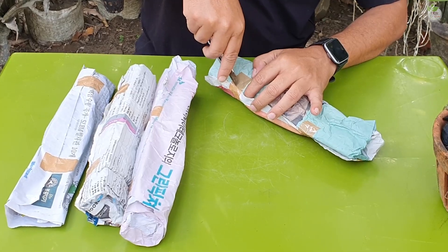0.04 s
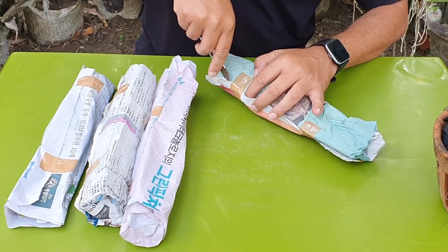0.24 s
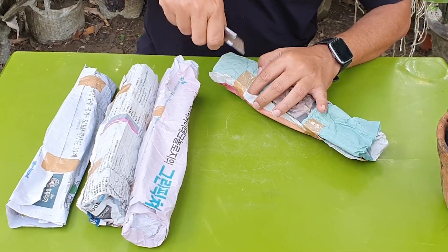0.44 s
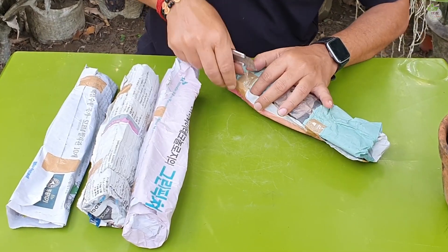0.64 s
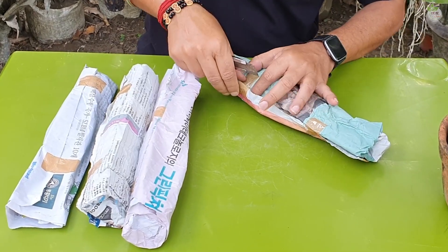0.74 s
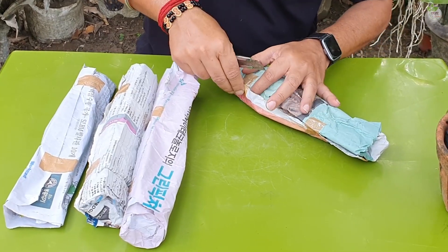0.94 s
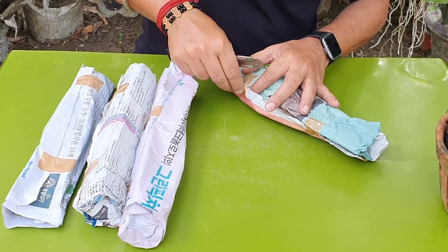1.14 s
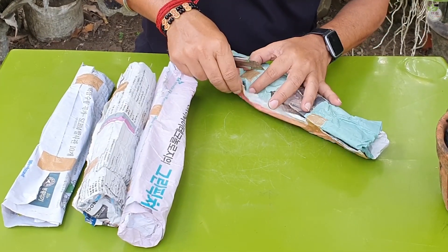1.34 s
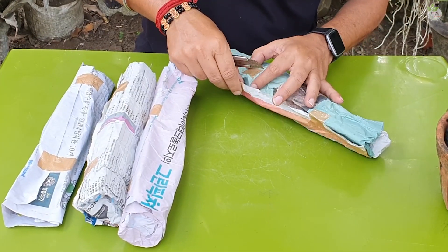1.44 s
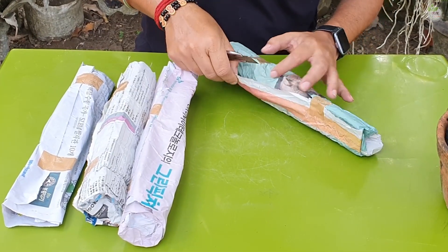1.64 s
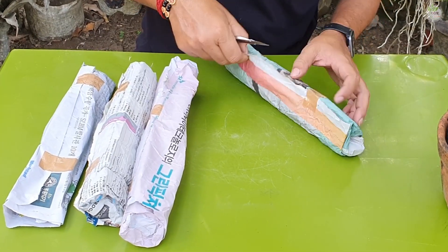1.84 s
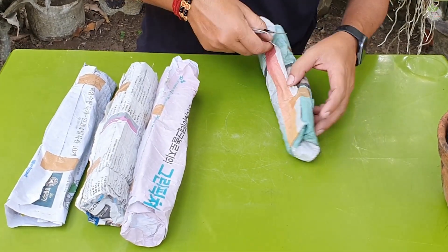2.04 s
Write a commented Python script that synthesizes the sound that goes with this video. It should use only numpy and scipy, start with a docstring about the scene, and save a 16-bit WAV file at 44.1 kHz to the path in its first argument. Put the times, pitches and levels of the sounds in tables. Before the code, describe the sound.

Newspaper round a hollow roll snaps and crackles sharply, then a knock and a short rumbling gust overload the close microphone; after that quiet, sparse rustles grow into crumpling, in a calm garden.

```python
"""Newspaper wrapped round a hollow roll is slit by a knife tip on a garden table, then pulled and crumpled.
Swarms of tiny creases, made of random clicks and noise, crackle, fizz and ring the roll; larger creases snap.
A finger squeaks as a stack of harmonics, the small blade rings as thin tones and the roll knocks the table.
A gust buffets the microphone with low filtered noise and pressure kicks.
Faint air and a thin insect hiss, both filtered noise, lie behind it all."""
import sys
import numpy as np
from scipy import signal
from scipy.io import wavfile
from scipy.ndimage import uniform_filter1d

SR = 44100
rng = np.random.default_rng(int(sys.argv[2]) if len(sys.argv) > 2 else 0)


def unload_wav(signal):
    """Save mono or channel-first audio to the path in sys.argv[1] as 16-bit WAV at rate SR, clipped to [-1, 1]."""
    wavfile.write(
        sys.argv[1],
        SR,
        np.round(np.clip(np.atleast_2d(signal).T, -1, 1) * 32767).astype(np.int16),
    )


N = 92610
T = np.arange(N) / SR  # time in seconds

# The notes the paper roll rings at. Each row: pitch in Hz, relative level in dB,
# time to fade by 60 dB in seconds (snaps add damping of their own).
ROLL_MODES = [(648, -5.5, 0.052), (842.5, -2, 0.047), (1060, -3, 0.051), (1275, -2.5, 0.034),
              (1473, -6, 0.047), (1740, -4, 0.012), (1976, -11, 0.037), (2172, -12.5, 0.035)]
# Tone of the fine fizz. Each row: frequency in Hz, relative gain in dB.
FIZZ_TONE = [(3240, -26.5), (5500, -6.5), (9070, -2), (12700, -0.5), (15000, -2.5), (16000, -34)]
# Tone of the crisp middle. Each row: frequency in Hz, relative gain in dB.
CRISP_TONE = [(1290, -8.5), (2200, -5.5), (3320, 0), (4650, -2), (5020, -2), (5500, 0.5), (7150, -81.5)]


def amp(db):
    """Turn decibels into a plain multiplier."""
    return 10 ** (np.asarray(db) / 20)


def evened(x):
    """Scale a signal to an rms (average strength) of 1."""
    return x / np.sqrt(np.mean(x ** 2) + 1e-20)


def level(table, column):
    """Gain over time, drawn in straight dB lines between the rows of a table."""
    rows = np.array(table)
    return amp(np.interp(T, rows[:, 0], rows[:, column]))


def colour(x, points):
    """Filter whose gain follows (Hz, dB) points and which responds only after its input."""
    f, db = np.transpose(points)
    hz = abs(np.fft.fftfreq(4096, 1 / SR))
    gain_db = np.interp(np.log(hz + 1), np.log(f + 1), db)
    log_gain = np.log(amp(np.maximum(gain_db, -90)))
    # The Hilbert transform supplies the phase that keeps the response early (minimum phase).
    taps = np.fft.ifft(np.exp(np.conj(signal.hilbert(log_gain)))).real[:2048]
    return signal.oaconvolve(x, taps / np.linalg.norm(taps))[:N]


def clicks(per_s, spread_db):
    """Random clicks of either sign, a few of them large, with an rms of 1."""
    draw = rng.random((N, 3))
    size = amp(-spread_db * np.log(draw[:, 0] + 1 / 200))
    sign = np.sign(draw[:, 1] - .5)
    happens = draw[:, 2] < per_s / SR
    return evened(size * sign * happens)


def train(table, column):
    """One click for each row of a table, sized by a dB column."""
    out = np.zeros(N)
    for row in table:
        out[min(round(row[0] * SR), N - 1)] += amp(row[column])
    return out


def garden():
    """Faint air is filtered noise; the insect hiss is noise squeezed into a narrow band."""
    # Tone of the air. Each row: frequency in Hz, relative gain in dB.
    air_tone = [(65, -20.5), (400, -7.5), (800, -20.5), (1400, -1), (2300, -44), (4200, -10), (7000, -37.5),
                (13700, -10)]
    # Loudness of the insect. Each row: time in seconds, level in dB.
    insect_levels = [(0, -79.5), (1.12, -61.5), (1.38, -59), (1.5, -72)]
    air_db = -57.5
    insect_hz, half_width_hz = 4810, 60
    edges = [insect_hz - half_width_hz, insect_hz + half_width_hz]
    band = signal.butter(2, edges, "band", fs=SR, output="sos")
    hiss = evened(signal.sosfilt(band, rng.standard_normal(N))) * level(insect_levels, 1)
    return amp(air_db) * colour(rng.standard_normal(N), air_tone) + hiss


def eddies():
    """Pressure pulses of mixed size at uneven but never bunched intervals."""
    per_s, spread_db = 130, 8.5  # average pulse rate; sizes lie between twice this many dB below full size and full size
    draw = rng.random((600, 2))
    at = (np.cumsum(.4 + 1.2 * draw[:, 0]) * SR / per_s).astype(int)
    out = np.zeros(N)
    out[at[at < N]] = amp(spread_db * (2 * draw[at < N, 1] - 2))
    return evened(out)


def gust():
    """Lumpy low turbulence: noise and eddy pulses filtered into a rumble and a flutter."""
    # Strength of the gust. Each row: time in seconds, rumble level in dB, flutter level in dB.
    gust_levels = [(.41, -90, -56), (.472, -39, -23.5), (.48, -9.5, -11.5), (.52, -9.5, -11.5),
                   (.64, -15, -13), (.8, -18, -15.5), (.886, -26.5, -34), (.908, -16.5, -31),
                   (.938, -52, -49), (.964, -23.5, -40.5), (1.01, -55.5, -56), (1.08, -90, -94)]
    # Tone of the rumble. Each row: frequency in Hz, relative gain in dB.
    rumble_tone = [(25, -26), (81, 1.5), (150, -0.5), (200, -30), (330, -89)]
    # Tone of the flutter. Each row: frequency in Hz, relative gain in dB.
    flutter_tone = [(70, -46.5), (150, 4), (240, 2), (350, -7), (640, -20.5), (1200, -31.5), (3000, -68.5)]
    eddy_share = 0.55  # the rest is smooth noise
    air = (1 - eddy_share) * rng.standard_normal(N) + eddy_share * eddies()
    rumble = evened(colour(air, rumble_tone)) * level(gust_levels, 1)
    flutter = evened(colour(air, flutter_tone)) * level(gust_levels, 2)
    return (rumble + flutter) * (T > gust_levels[0][0])


def buffets():
    """Each buffet is a pressure kick, sharper the higher its pitch, with a spit of noise round that pitch."""
    # Hardest buffets of the gust. Each row: start in seconds, relative level in dB, pitch in Hz.
    hits = [(0.491, -2.5, 1150), (0.505, -3.5, 1940), (0.516, -2.5, 1620), (0.521, -0.5, 1240),
            (0.544, 2, 875), (0.556, -1.5, 1310), (0.566, 1.5, 1655), (0.600, -0.5, 1080),
            (0.613, -6, 1354), (0.627, -2, 1900), (0.66, -5.5, 1410), (0.688, -4.5, 1400),
            (0.701, -1.5, 444), (0.725, -3, 930), (0.729, -10, 450), (0.769, -6, 746), (0.796, -2, 580),
            (0.82, -8.5, 408), (0.9, -14, 400)]
    kick_cycles = .75  # width of the kick, in cycles of its pitch
    spit_s, spit_octaves = 0.0032, .22  # time to the spit's peak; reach to either side of the pitch
    out, t = np.zeros(N + 1000), T[:1000]
    for (s, db, hz), noise in zip(hits, rng.standard_normal((len(hits), 1000))):
        u = t * hz / kick_cycles - 3
        kick = (1 - u * u) * np.exp(-u * u / 2)
        edges = hz * 2. ** np.array([-spit_octaves, spit_octaves])
        band = signal.butter(2, edges, "band", fs=SR, output="sos")
        spit = evened(signal.sosfilt(band, noise)) * t / spit_s * np.exp(-t / spit_s)
        out[round(s * SR):][:1000] += amp(db) * (amp(-2.0) * kick + amp(-15.5) * spit)
    return out[:N]


def table_echo(x):
    """Short diffuse return from table and body: the sound smeared by fading noise."""
    t60 = 0.047  # seconds to fade by 60 dB
    t = T[:4000]
    taps = rng.standard_normal(len(t)) * amp(-60 * t / t60) * (t > .002)
    return signal.oaconvolve(x, taps / np.linalg.norm(taps))[:N]


def knocks():
    """Dull short rings with a soft start: one low thump just before the gust, then the roll knocking the table."""
    # Each row: start in seconds, level in dB, pitch in Hz.
    hits = [(0.436, -6.5, 192), (1.934, -33.5, 188), (1.967, -25, 417), (1.994, -25.5, 407)]
    t60 = 0.04  # seconds to fade by 60 dB
    out, t = np.zeros(N + 4000), T[:4000]
    for s, db, hz in hits:
        fade = amp(db - 60 * t / t60)
        out[round(s * SR):][:4000] += fade * np.sin(2 * np.pi * hz * t) * (1 - np.exp(-t * hz))
    return out[:N]


def blade():
    """The small blade rings in thin steel tones; each touch wakes a different share of them."""
    # Tones of the blade. Each row: pitch in Hz, relative level in dB.
    tones = [(5600, -3), (7200, 5), (8100, -4), (9600, -1), (10400, 2.5), (12100, -8), (13600, -2)]
    # Touches of the blade. Each row: start in seconds, relative level in dB.
    touches = [(.594, -18), (0.629, -30.5)]
    t60 = 0.072  # seconds to fade by 60 dB
    out, t = np.zeros(N + 6000), T[:6000]
    for (s, touch_db), shares in zip(touches, rng.random((len(touches), len(tones)))):
        tone = sum(w * amp(db) * np.sin(2 * np.pi * hz * t) for w, (hz, db) in zip(shares, tones))
        out[round(s * SR):][:6000] += amp(touch_db - 60 * t / t60) * tone
    return out[:N]


def squeak():
    """A finger sticks and slips quickly: a rough stack of harmonics whose bright region climbs."""
    # The finger along the paper. Each row: time in seconds, relative level in dB, brightest region in Hz.
    path = [(0.436, -12.5, 800), (0.452, -21.5, 1700), (0.475, -34.5, 3300)]
    pitch_hz, jitter, bright_octaves = 854, .03, 0.54  # jitter is the rms share of the pitch
    s, _, bright_hz = np.transpose(path)
    wobble = evened(uniform_filter1d(rng.standard_normal(N), size=300))
    turns = np.cumsum(pitch_hz * (1 + jitter * wobble)) / SR
    bright = np.interp(T, s, bright_hz)
    stack = 0
    for k in range(1, 6):
        octaves_off = np.log2(k * pitch_hz / bright)
        strength = 0.1 / k + np.exp(-(octaves_off / bright_octaves) ** 2)
        stack = stack + strength * np.cos(2 * np.pi * k * turns)
    gate = np.clip(np.minimum(T - s[0], s[-1] - T) / 0.0029, 0, 1)  # 2.9 ms ramps at both ends
    return gate * level(path, 1) * stack


def ring(weights):
    """One strike of the roll: its modes ring and fade, each weighted by where it is struck."""
    t = T[:3000]
    return sum(w * amp(db - 60 * t / t60) * np.sin(2 * np.pi * hz * t)
               for w, (hz, db, t60) in zip(weights, ROLL_MODES))


def snaps():
    """Each larger crease rings the modes near its pitch and spits a short bright tick."""
    # Single creases snapping. Each row: start in seconds, ring level in dB, relative tick level in dB,
    # strongest pitch in Hz.
    creases = [(0.19, -17, -32, 800), (0.225, -4.5, -9, 1126), (0.231, -9, -15.5, 1000),
               (0.247, -26, -9, 1000), (0.342, -15, -37, 860), (0.35, -18.5, -20, 840),
               (0.416, -20, -23, 730), (1.069, -43.5, -41, 660), (1.129, -56, -35, 810),
               (1.144, -36.5, -40, 950), (1.149, -40, -33.5, 830), (1.263, -36, -33, 1230),
               (1.3196, -23, -28, 1146), (1.326, -23, -39, 1170), (1.343, -17.5, -36.5, 773),
               (1.348, -18, -27, 977), (1.843, -23.5, -57, 1380), (1.865, -13, -25, 1100),
               (1.872, -14, -22, 1160), (1.928, -20.5, -35.5, 1004), (1.965, -16, -27.5, 1070),
               (1.987, -16.5, -45, 1040), (2.068, -20.5, -43, 2100)]
    spot_octaves, damp_db_s = 0.38, 1400  # reach round the strongest pitch; extra fading in dB per second
    tick_s, tick_rise_s = 0.0012, 0.00031  # time constants of the tick's fall and rise
    out = np.zeros(N + 3000)
    shape = (len(creases), len(ROLL_MODES))
    spots = rng.uniform(0.17, 1, shape) * rng.choice([-1, 1], shape)
    modes_hz = np.array(ROLL_MODES)[:, 0]
    for (s, ring_db, _, hz), spot in zip(creases, spots):
        nearness = np.exp(-(np.log2(modes_hz / hz) / spot_octaves) ** 2)
        taps = ring(spot * (0.17 + nearness)) * amp(-damp_db_s * T[:3000])
        out[round(s * SR):][:3000] += amp(ring_db) * taps / abs(taps).max()
    t = T[:1000]
    tick = np.exp(-t / tick_s) * (1 - np.exp(-t / tick_rise_s))
    burst = signal.oaconvolve(train(creases, 2), tick)[:N] * rng.standard_normal(N)
    return out[:N] + amp(7.0) * colour(burst, FIZZ_TONE) + amp(-4.0) * colour(burst, CRISP_TONE)


def patchy(x):
    """Different parts of the sheet colour the sound from moment to moment."""
    patch_db = 2.0  # rms size of the level changes
    z = signal.stft(x, nperseg=256)[2]
    field = uniform_filter1d(rng.standard_normal(z.T.shape), size=12, axis=0)  # smooth over time
    field = evened(uniform_filter1d(field, size=4, axis=1)).T  # smooth over frequency
    return signal.istft(z * amp(patch_db * field), nperseg=256)[1][:N]


def rustle():
    """Swarms of tiny creases: they ring the roll, crackle and fizz."""
    # Rustle of the paper. Each row: time in seconds, then relative levels in dB of the fizz,
    # the ring of the roll and the crisp middle.
    motion = [(0, -59, -55.5, -79), (.175, -63, -64.5, -71), (.19, -34, -28, -54), (.21, -23, -20.5, -25),
              (.23, -13, -10, -14.5), (.253, -14.5, -31, -33), (.27, -41, -42.5, -42),
              (.337, -57.5, -59.5, -58), (.345, -24, -29.5, -27), (.41, -31, -41.5, -46.5),
              (.44, -37.5, -23.5, -34.5), (.474, -22.5, -21, -26.5), (.482, -31, -54, -35),
              (.56, -34.5, -29, -33.5), (.595, -19.5, -25, -29), (.67, -33.5, -47, -38),
              (.74, -38, -43, -40.5), (.82, -30, -33.5, -37.5), (.94, -44.5, -44, -55),
              (.965, -27.5, -36, -35), (1.0, -36.5, -40, -41), (1.04, -52, -52.5, -57.5),
              (1.15, -45, -62, -51.5), (1.22, -63, -54.5, -59), (1.27, -36, -53.5, -39.5),
              (1.33, -39, -38, -41), (1.41, -59.5, -56.5, -57), (1.52, -59, -52, -61.5),
              (1.555, -37.5, -33, -48), (1.58, -49.5, -48, -56.5), (1.62, -67, -52, -70),
              (1.67, -38, -36.5, -44.5), (1.8, -29.5, -43, -41.5), (1.88, -26.5, -25.5, -29.5),
              (1.9, -41, -42, -39), (1.99, -30, -28, -35), (2.03, -31.5, -42, -33.5),
              (2.1, -25.5, -34, -30.5)]
    per_s, spread_db = 2500, 4  # clicks per second; spread of their sizes
    body = 0
    for mode in np.eye(len(ROLL_MODES)):  # each mode gets its own clicks
        taps = ring(mode)
        strikes = clicks(per_s / 2, spread_db) * level(motion, 2)
        body = body + signal.oaconvolve(strikes, taps)[:N]
    body = body / np.linalg.norm(ring(np.ones(len(ROLL_MODES))))
    fine = evened(rng.standard_normal(N) + 0.17 * clicks(per_s, spread_db))
    coarse = clicks(per_s, spread_db)
    fizz = colour(fine * level(motion, 1), FIZZ_TONE)
    crisp = colour(evened(coarse + fine) * level(motion, 3), CRISP_TONE)
    return amp(-1.5) * body + amp(-6.0) * patchy(fizz + crisp)


def scene():
    """Thin the paper's lows, add the other handling sounds and their echo, then the wind and garden."""
    creases = rustle() + snaps()
    low_cut = signal.butter(4, 540, "high", fs=SR, output="sos")  # Hz
    paper = signal.sosfilt(low_cut, creases) + amp(-23) * creases  # a little of the lows leaks through
    paper = paper + knocks() + blade() + squeak()
    return (paper + amp(-12) * table_echo(paper) + gust() + buffets() + garden())[None]


def record(dry):
    """Overload flattens loud peaks with a rounded knee, then the highest treble is cut."""
    ceiling, knee, edge_hz = .84, 6, 16150  # a larger knee number bends more sharply
    soft = dry / (1 + abs(dry / ceiling) ** knee) ** (1 / knee)
    low_pass = signal.firwin(511, edge_hz, window=("kaiser", 9), fs=SR)
    return signal.oaconvolve(soft, low_pass[None], "same")


dry = scene()
out = record(dry)
unload_wav(out)
```